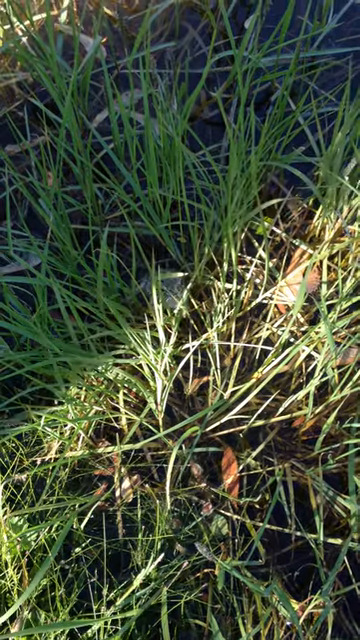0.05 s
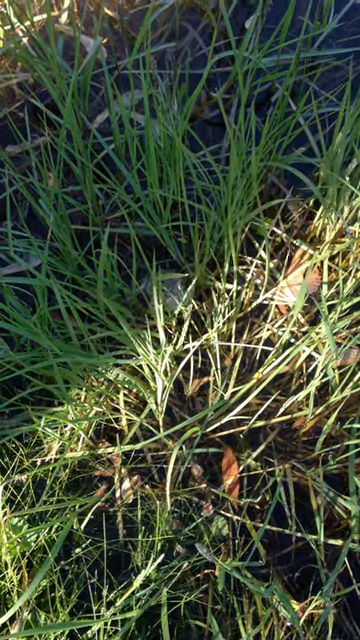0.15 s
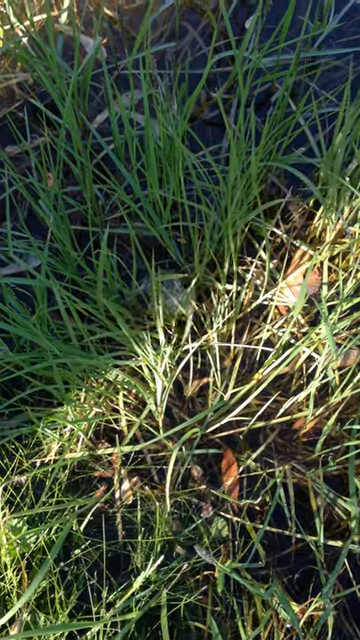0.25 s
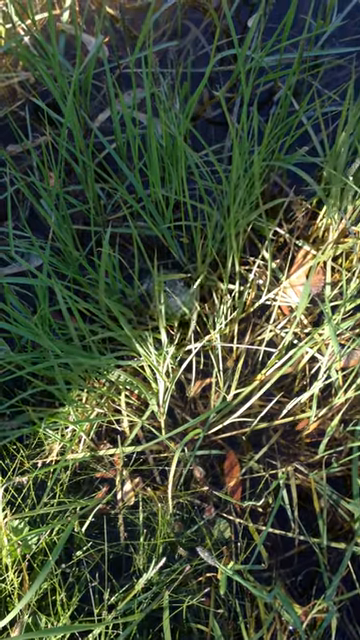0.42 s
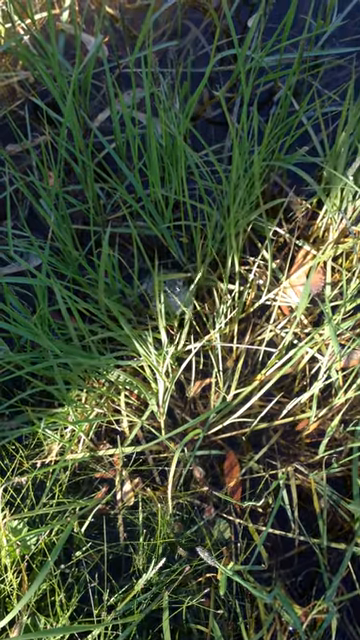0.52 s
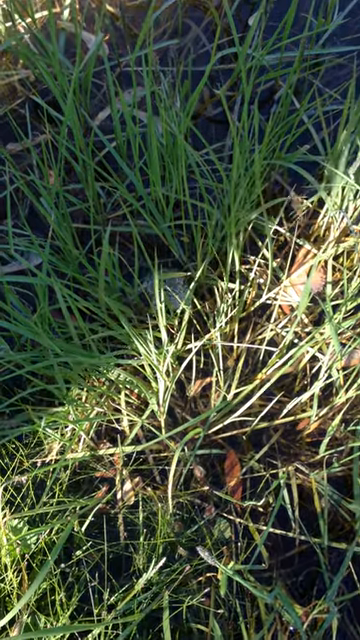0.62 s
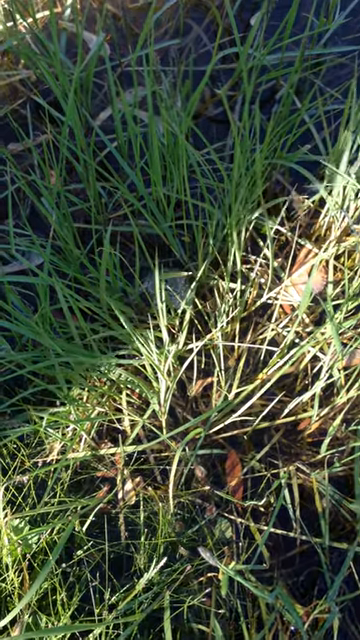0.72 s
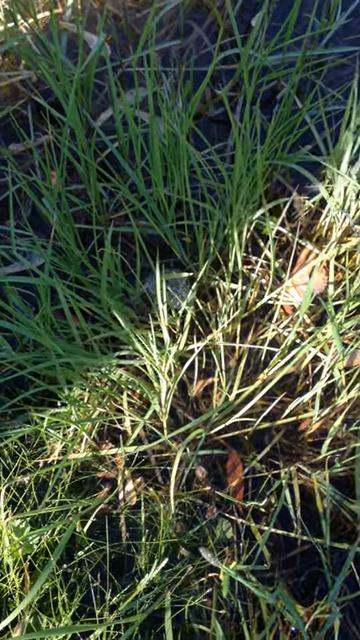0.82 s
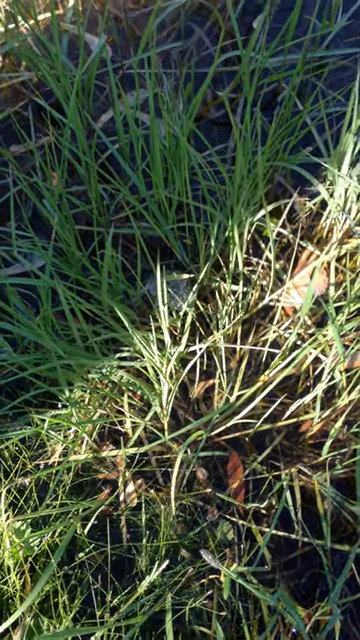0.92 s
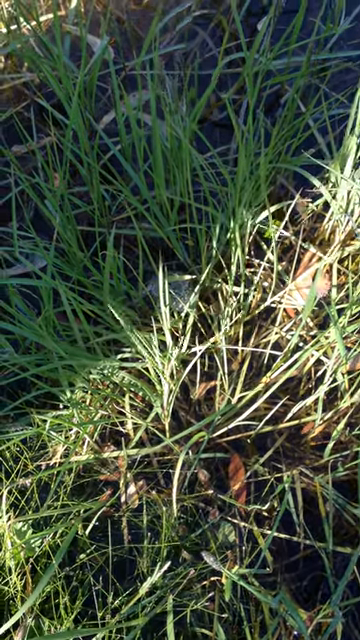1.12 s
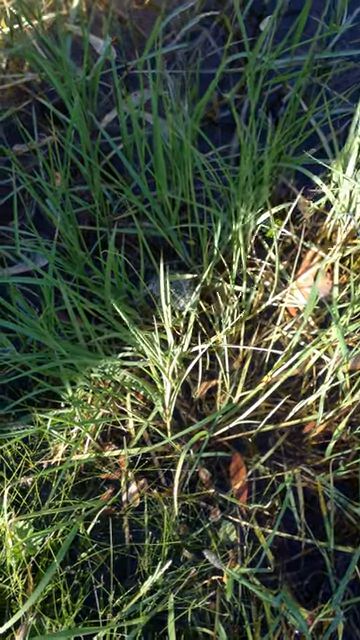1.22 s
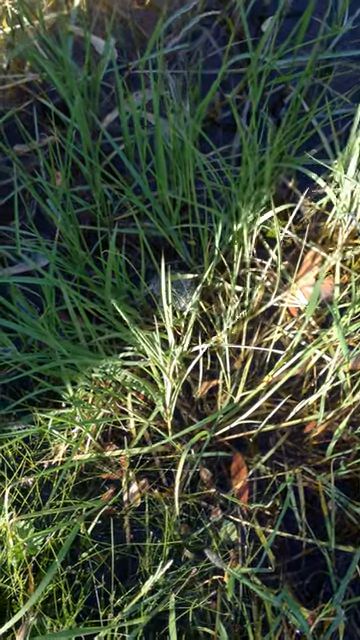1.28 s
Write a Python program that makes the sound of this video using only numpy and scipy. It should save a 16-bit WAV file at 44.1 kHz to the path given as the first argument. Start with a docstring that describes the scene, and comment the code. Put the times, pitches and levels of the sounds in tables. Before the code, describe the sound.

A tree frog close to the microphone gives one short croak of ten quick, rising chirps on a grassy bank. Soft handling bumps and a light brush of grass follow over quiet air.

```python
"""A grassy bank outdoors: a tree frog close by gives one croak, ten quick pulses, each an upward chirp.
Soft ticks of the opening larynx lead into the pulses. Each pulse starts rough, then swells into a
clean tone with a strong octave and a thin whistle, coloured by throat and vocal sac.
The bank scatters the call and a faint ring lingers. Soft handling bumps and a brush of grass
follow, over quiet air."""
import sys
import numpy as np
from scipy import signal
from scipy.fft import rfft, irfft
from scipy.io import wavfile
from scipy.ndimage import map_coordinates

SR = 44100
rng = np.random.default_rng(int(sys.argv[2]) if len(sys.argv) > 2 else 0)


def store_pcm(level_fs):
    """Save levels as 16-bit WAV."""
    pcm = np.round(np.clip(level_fs, -1, 1) * 32767).astype(np.int16)
    wavfile.write(sys.argv[1], SR, np.atleast_2d(pcm).T)


N = 59535
T = np.arange(N) / SR
BIN_HZ = np.arange(N // 2 + 1) * SR / N


def undb(db):
    """Decibels to gain."""
    return 10 ** (np.asarray(db) / 20)


def gain_at(hz, colour):
    """Gain from rows of freq_hz, gain_db, on a log frequency axis."""
    freq_hz, gain_db = np.array(colour).T
    return undb(np.interp(np.log(np.maximum(hz, 1)), np.log(freq_hz), gain_db))


def noise(colour):
    """Coloured noise, rms 1."""
    x = irfft(rfft(rng.standard_normal(N)) * gain_at(BIN_HZ, colour), N)
    return x / np.sqrt(np.mean(x ** 2))


def wobble(rate_hz):
    """Smooth random motion, spread near 1."""
    return map_coordinates(rng.standard_normal(N), [T * rate_hz], order=3, mode="mirror")


def blip(start_s, rise_s):
    """Swell and fade, peak 1 after rise_s."""
    u = np.maximum(T - start_s, 0) / rise_s
    return (u * np.exp(1 - u)) ** 2


# freq_hz, gain_db
AIR_COLOUR = [(25, -49.5), (55, -30.5), (90, -6.5), (140, -5.5), (200, 2), (300, -7.5), (480, -12.5),
              (1000, -16), (1500, -19.5), (2500, -21), (4600, -24), (5600, -30), (10000, -35),
              (15500, -37.5)]
# time_s, level_db
AIR_LEVEL = [(0, -58), (.25, -55.5), (.56, -60.5), (.95, -60), (1.2, -59), (1.35, -60)]


def air():
    """Distant rumble and faint hiss, nearly steady."""
    return undb(np.interp(T, *np.array(AIR_LEVEL).T)) * noise(AIR_COLOUR)


# freq_hz, gain_db
RUSTLE_COLOUR = [(250, -1), (600, 20), (900, -9), (2000, -8), (3500, -11), (4700, 10), (5600, -23),
                 (14000, -22)]


def rustle():
    """Grass blades brush softly as the hand shifts."""
    level_db = -68 + 1.3 * wobble(150)
    return undb(level_db) * blip(start_s=1.08, rise_s=.024) * noise(RUSTLE_COLOUR)


# start_s, pitch_hz, level_db, rise_s
BUMPS = [(1.082, 288, -50.5, 0.0047), (1.101, 300, -45.5, 0.007), (1.155, 155, -42.5, 0.0057),
         (1.172, 135.5, -42.5, 0.0072), (1.203, 197, -53, 0.027), (1.32, 173.2, -48.5, 0.0068)]


def bumps():
    """Dull knocks of the hand on the recorder: a low tone and one inharmonic overtone."""
    out = np.zeros(N)
    for start_s, pitch_hz, level_db, rise_s in BUMPS:
        phase = 2 * np.pi * pitch_hz * (T - start_s)
        tone = np.sin(phase) + undb(-10) * np.sin(2.1 * phase)
        out += undb(level_db) * blip(start_s, rise_s) * tone
    return signal.sosfilt(signal.butter(3, 70, "high", fs=SR, output="sos"), out)


# freq_hz, gain_db
SCATTER_COLOUR = [(400, -12), (900, -7), (1300, -5), (1800, 0), (2100, -1), (2700, -6), (5000, -2),
                  (14000, -2)]
# freq_hz, gain_db
FAR_COLOUR = [(400, -16), (1000, -11.5), (1500, -10), (1800, -4), (2050, -2.5), (2500, -5.5),
              (14000, -18.5)]


def surroundings(call, build_s=.008, ring_hz=1820, ring_width_hz=190, echo_s=.027):
    """Quick scatter from grass and bank, a faint far ring and tail, one weak echo."""
    def reverb(carrier, t60_s, band_gain_db):
        response = carrier * undb(-60 * T / t60_s) * (1 - np.exp(-T / build_s))
        response /= np.sqrt(np.mean(np.abs(rfft(response)[voice_band]) ** 2))
        return undb(band_gain_db) * signal.fftconvolve(call, response)[:N]

    voice_band = (BIN_HZ > 1600) & (BIN_HZ < 2100)
    phase = 2 * np.pi * ring_hz * T
    narrow_noise = wobble(ring_width_hz) * np.sin(phase) + wobble(ring_width_hz) * np.cos(phase)
    scatter = reverb(noise(SCATTER_COLOUR), t60_s=.105, band_gain_db=-27)
    ring = reverb(narrow_noise, t60_s=1.05, band_gain_db=-44)
    far = reverb(noise(FAR_COLOUR), t60_s=.7, band_gain_db=-52)
    echo = undb(-36) * np.interp(T - echo_s, T, call)
    return scatter + ring + far + echo


def snap():
    """One broadband click on the ninth pulse."""
    return undb(-40) * blip(start_s=.4501, rise_s=.00012) * rng.standard_normal(N)


# freq_hz, gain_db
THROAT_COLOUR = [(300, -6), (580, -8.5), (690, -2.5), (780, 8.5), (900, -1), (1020, -1), (1250, 4.5),
                 (1550, -2), (1750, 6.5), (2050, -1.5), (2400, -2.5), (2900, -3), (3400, -3.5),
                 (11000, -0.5), (12500, -11.5), (15500, -3.5)]


def throat(x):
    """Resonances of throat and vocal sac, as a minimum-phase filter."""
    gain = gain_at(np.arange(N + 1) * SR / (2 * N), THROAT_COLOUR)
    cepstrum = irfft(np.log(gain))
    cepstrum[1:N] *= 2
    cepstrum[N + 1:] = 0
    return irfft(rfft(x, 2 * N) * np.exp(rfft(cepstrum)))[:N]


# freq_hz, gain_db
RASP_COLOUR = [(300, -22), (1200, 4.5), (2500, 17), (3350, 4.5), (3750, 1), (4200, 1), (4700, -0.5),
               (5400, -12), (6400, -1), (6850, -2), (7250, 6), (7700, -7.5), (8200, -9.5), (9500, -21),
               (11000, -20), (12300, -21.5), (14000, -18), (15500, -19)]


def rasp(pitch_hz, phase, hiss):
    """Buzz of harmonics 4 to 15 plus breathy hiss."""
    harmonics = np.arange(4, 16)[:, None]
    weights = gain_at(harmonics * pitch_hz, RASP_COLOUR)
    offsets = rng.uniform(0, 2 * np.pi, harmonics.shape)
    buzz = (weights * np.sin(harmonics * phase + offsets)).sum(0)
    return buzz / np.sqrt((weights ** 2).sum(0).mean()) + undb(3.5) * hiss


# start_s, level_db
TICKS = [(.1690, -33), (.2030, -39), (.2410, -39), (.2790, -37), (.3170, -38), (.3560, -37), (.3945, -41),
         (.4345, -36), (.4720, -39)]
ROUGH_RATE_HZ = 550


def ticks(pitch_hz=800):
    """The larynx opens with a brief rough tone before each pulse but the first."""
    phase = 2 * np.pi * np.cumsum(pitch_hz * (1 + .069 * wobble(ROUGH_RATE_HZ))) / SR
    tone = np.sin(phase) + undb(-3) * np.sin(2 * phase) + undb(-23) * noise(RASP_COLOUR)
    return tone * sum(undb(level_db) * blip(start_s, rise_s=.002) for start_s, level_db in TICKS)


def envelope(age_s, rise_s, lag_s, swell_db_per_s, decay_db_per_s, crest_s=.0015, onset_s=.0017):
    """Quick onset, swell, rounded crest near lag_s, decay; age_s is 0 at the end of the rise."""
    u = (age_s - lag_s) / crest_s
    db = -crest_s * (swell_db_per_s * np.logaddexp(0, -u) + decay_db_per_s * np.logaddexp(0, u))
    gate = np.sin(np.pi / 2 * np.clip((age_s + rise_s) / onset_s + .5, 0, 1)) ** 2
    return undb(db - db.max()) * gate


def whistle(t_s, end_hz, jitter, flutter, fall_hz=700, fall_s=.005):
    """Thin, fluttering high tone that slides down to end_hz."""
    pitch_hz = end_hz + fall_hz * (.5 - .5 * np.tanh((t_s - .003) / fall_s))
    phase = 2 * np.pi * np.cumsum(pitch_hz * (1 + .006 * jitter)) / SR
    return np.sin(phase) * (1 + .45 * flutter)


# start_s, rise_s, end_pitch_hz, fundamental_db, octave_db, rasp_db, whistle_end_hz, decay_stretch
PULSES = [(0.1407, 0.0025, 824, -32, -38.5, -61.5, 12400, 0.23),
          (0.1811, .0036, 960, -22, -38, -57, 12500, .55), (.2143, .0064, 965, -19.5, -21, -43, 12600, 0.7),
          (.2485, 0.012, 1056, -13.5, -11, -33.5, 11000, 0.7),
          (0.285, 0.014, 1049, -11.5, -7.5, -32, 10500, 0.77),
          (.3250, .0095, 1032, -15.5, -11, -36, 10000, 0.9),
          (0.3621, 0.011, 1032, -14.5, -10.5, -36, 9873, 0.9),
          (0.3975, 0.014, 979.5, -18.5, -14, -37, 10140, 0.97),
          (0.4391, 0.014, 1066, -12, -7, -32.5, 10140, 0.79),
          (0.4793, .0128, 1025, -16.5, -11.5, -36, 10150, 0.86)]


def pulses(start_pitch_hz=786, roughness=.33, settle_s=.0035):
    """Rising tones: the upper harmonics rasp, the fundamental rings on in the vocal sac."""
    out = np.zeros(N)
    motion = [wobble(ROUGH_RATE_HZ) for _ in range(3)]
    hiss = noise(RASP_COLOUR)
    for start_s, rise_s, end_hz, fundamental_db, octave_db, rasp_db, whistle_hz, stretch in PULSES:
        near = np.abs(T - start_s) < .05
        shimmer, flutter, jitter = (m[near] for m in motion)
        t_s = T[near] - start_s - rise_s
        age_s = np.where(t_s > 0, t_s / stretch, t_s)
        unsettled = .5 - .5 * np.tanh((t_s + settle_s) / .0015)  # 1 to 0 as the tone clears
        glide_hz = np.interp(t_s / rise_s, [-.72, .35], [start_pitch_hz, end_hz])
        pitch_hz = glide_hz * (1 + .03 * unsettled * jitter)
        phase = 2 * np.pi * np.cumsum(pitch_hz) / SR

        fundamental_gain = undb(fundamental_db) * envelope(age_s, rise_s, .0038, 1500, 2000)
        octave_gain = undb(octave_db) * envelope(age_s, rise_s, .0041, 1700, 3630, crest_s=.0033)
        third_gain = undb(rasp_db + 8.5) * envelope(age_s, rise_s, .0024, 1600, 6000)
        whistle_gain = undb(rasp_db - 12.5) * envelope(age_s, rise_s, .003, 1200, 2400)
        rasp_gain = undb(rasp_db) * envelope(age_s, rise_s, .0035, 1100, 8000)

        upper = octave_gain * np.sin(2 * phase)
        upper += third_gain * np.sin(3 * phase) * (1 + .35 * flutter)
        upper += whistle_gain * whistle(t_s, whistle_hz, jitter, flutter)
        out[near] += fundamental_gain * np.sin(phase) * (1 + roughness * unsettled * flutter)
        out[near] += upper * (1 + roughness * unsettled * shimmer)
        out[near] += rasp_gain * rasp(pitch_hz, phase, hiss[near])
    return out


def scene():
    """Frog, reflections, handling noises and air, in mono."""
    call = throat(pulses() + ticks()) + snap()
    return (call + surroundings(call) + bumps() + rustle() + air())[None]


def record(dry, cutoff_hz=15400):
    """Steep low-pass of the recorder."""
    return signal.sosfilt(signal.ellip(10, .1, 80, cutoff_hz, fs=SR, output="sos"), dry)


dry = scene()
out = record(dry)
store_pcm(out)
```